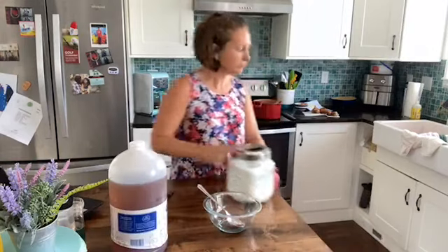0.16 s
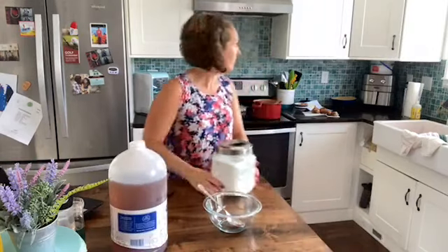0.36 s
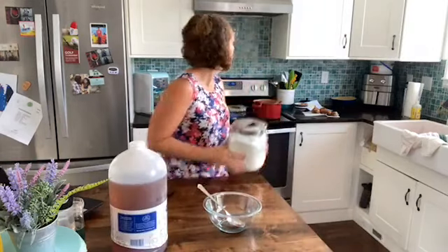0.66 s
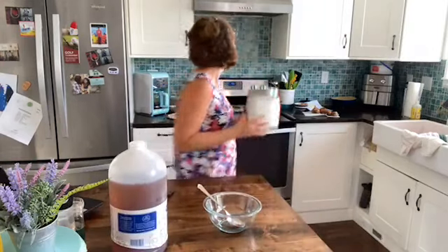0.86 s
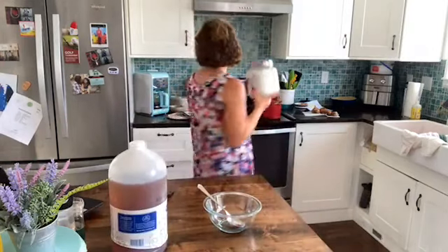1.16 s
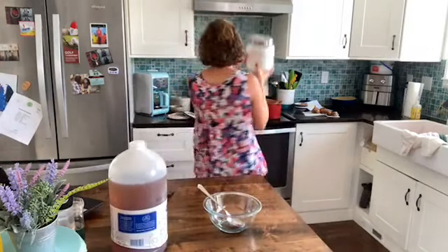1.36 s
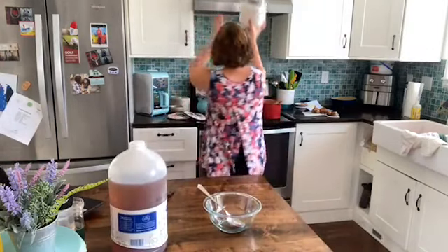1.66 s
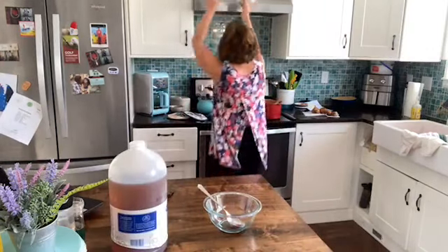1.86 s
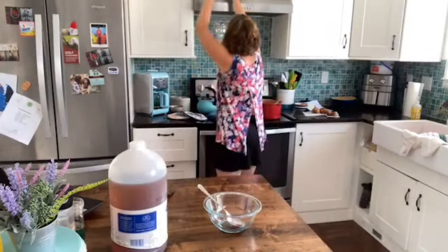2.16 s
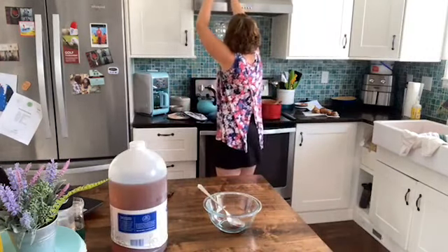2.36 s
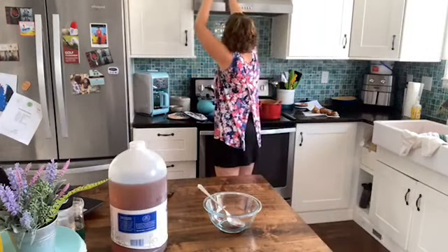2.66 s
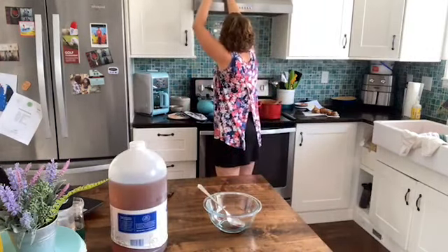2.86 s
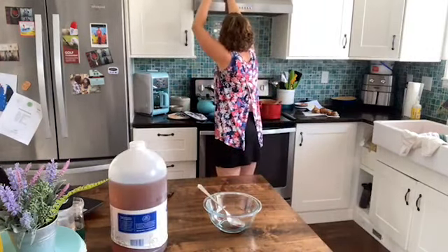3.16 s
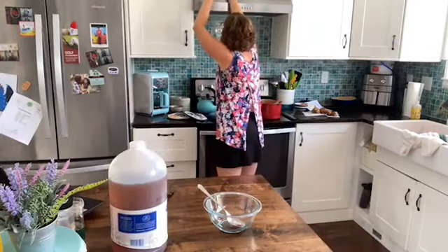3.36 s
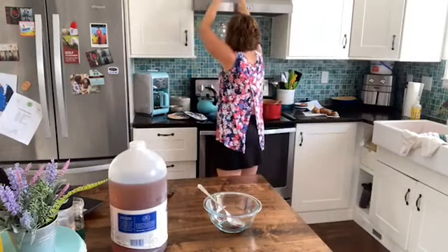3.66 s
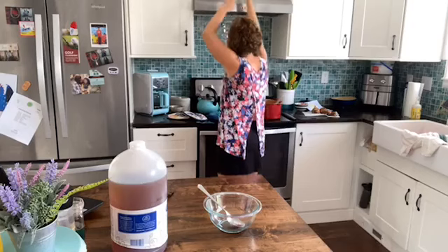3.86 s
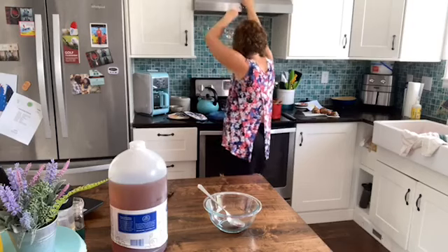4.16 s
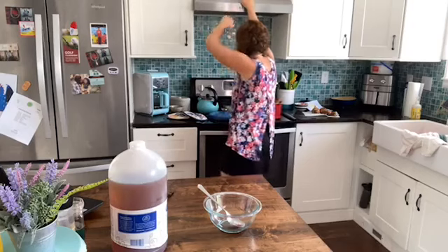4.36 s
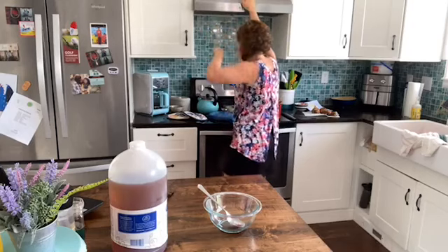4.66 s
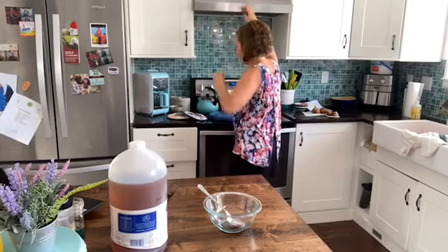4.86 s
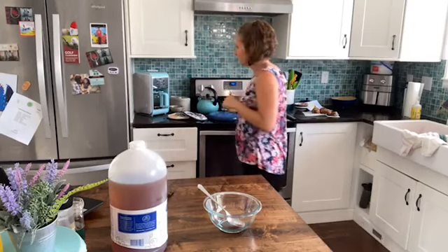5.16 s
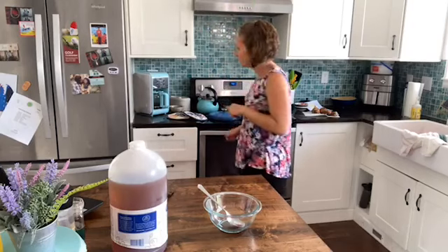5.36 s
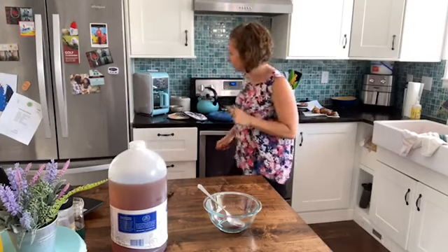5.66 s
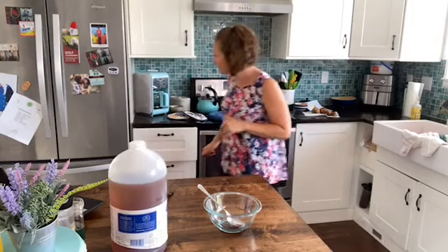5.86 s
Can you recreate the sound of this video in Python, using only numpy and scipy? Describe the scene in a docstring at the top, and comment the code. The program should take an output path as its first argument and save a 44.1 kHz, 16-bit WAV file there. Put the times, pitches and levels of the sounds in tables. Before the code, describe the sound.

A glass canister drags softly across a wooden table over a steady appliance hum. After a lull with faint touches and cloth rustle, it knocks down on a cupboard shelf, bumps and scrapes back, and clacks against a jar. The cupboard door then shuts with a low boom and a bounce, leaving faint metal ticks. The knocks sound distant and ring in a hard-walled kitchen.

```python
"""Putting a glass canister away.

In a hard-walled kitchen a glass canister is dragged off a wooden table, set down on a high shelf and
pushed back until it clacks against a jar; then the cupboard door is knocked shut with a low boom.
A loose metal fitting ticks after the jolts, cloth rustles and fingers touch things. The knocks are far
from the microphone and ring in the room; the drags and rustles are drier. Appliances hum throughout."""
import sys
import numpy as np
from scipy import signal
from scipy.fft import rfft, irfft, next_fast_len
from scipy.io import wavfile
from scipy.ndimage import uniform_filter1d

SR = 44100
rng = np.random.default_rng(int(sys.argv[2]) if len(sys.argv) > 2 else 0)


def store_wav(level_fs):
    """Save 16-bit WAV to argv[1]."""
    pcm = np.round(np.clip(np.atleast_2d(level_fs), -1, 1) * 32767)
    wavfile.write(sys.argv[1], SR, pcm.T.astype(np.int16))


N = 265349

# The canister sliding on wood. Each row: time in seconds, level in dB.
TABLE_DRAG = [(0.0, -35.5), (0.05, -37.5), (0.12, -40.5), (0.318, -33), (0.6, -42), (0.72, -50),
              (0.82, -56), (0.9, -76)]
SHELF_DRAG = [(3.03, -78), (3.052, -35), (3.084, -35), (3.2, -44.5), (3.294, -33.5), (3.34, -27),
              (3.4, -22), (3.462, -34), (3.645, -39.5)]
# Strokes of cloth. Each row: peak time in seconds, peak level in dB, rise and fall in seconds.
CLOTH_STROKES = [(.3, -75, .1, 0.38), (1.33, -66.5, 0.04, 0.056), (2.32, -57, 0.12, 0.16),
                 (4.168, -68, 0.035, 0.077), (5.65, -71.5, 0.056, .05)]
# Knocks. Each row: start in seconds, rough peak in dB, hardness in dB per octave, contact in seconds.
JAR_CLACK = [(3.647, -17, -1.5, 0.00416)]
DOOR_CRACKS = [(4.421, -17.5, 2, 0.0026), (4.427, -17, -0.5, 0.0059)]
DOOR_HITS = [(4.423, -12, 0.9, 0.0049), (4.44, -13, 1, 0.011), (4.462, -14.5, 2, 0.0116),
             (4.585, -16.5, 1, 0.037)]
# Fingers and feet. Each row: as for a knock, then one ring's pitch in Hz, width in Hz, boost in dB.
TOUCHES = [(0.839, -48, -3.5, 0.011, 2300, 250, 13), (1.057, -46.5, -3, 0.023, 1460, 60, 16),
           (1.683, -47, 0.5, 0.007, 3300, 1500, 7), (1.848, -49.5, -2, 0.0099, 2900, 1500, 4),
           (4.104, -46.5, -2, 0.015, 2030, 500, 2), (4.165, -38.5, -4, 0.024, 1750, 900, 3),
           (5.305, -46, -1, 0.01, 2600, 900, 3), (5.439, -51.5, -1, 0.021, 3100, 252, 7)]
# The canister meeting the shelf. Each row: as for a knock, then the force on the glass in dB.
SHELF_KNOCKS = [(2.551, -15.5, 2.5, 0.0079, -95), (2.561, -5.5, 2, 0.0079, -65.5),
                (2.568, -11.5, -1.5, 0.0066, -71.5), (2.609, -16, -4.5, .006, -75),
                (3.044, -25.5, 1, 0.0084, -90), (3.052, -20.5, -1, 0.013, -84),
                (3.085, -33.5, 3.5, 0.004, -78.5), (3.149, -24.5, 1.5, 0.0042, -95),
                (3.344, -19.5, 5, 0.0039, -74), (3.380, -8, 1.5, 0.012, -66),
                (3.435, -11.5, 1, 0.0084, -66.5)]
# Runs of ticks. Each row: first and last start in seconds, first and last level in dB.
TICK_RUNS = [(2.655, 2.85, -47, -49.5), (3.185, 3.22, -50, -52), (3.297, 3.329, -49, -47),
             (4.517, 4.644, -46, -61), (4.848, 4.919, -49, -55)]
# The door swinging and settling. Each row: start in seconds, boom level in dB, pitch in Hz.
DOOR_SWINGS = [(4.428, -14.5, 87.4), (4.499, -26.5, 76), (4.596, -26.5, 82.3), (4.689, -34, 88),
               (4.783, -38, 101)]
# The broad colour of each source. Each row: frequency in Hz, spectral level in dB.
HUM_COLOUR = [(15, -46), (25, -32), (48, -6.5), (80, -12), (102, -3.5), (189, -4), (291, -8.5), (382, -10),
              (414, -12), (486, -11), (620, -19), (749, -20), (1360, -27.5), (1550, -27.5), (15800, -48)]
TABLE_COLOUR = [(50, -12), (100, -4.5), (230, -0.5), (500, -4), (900, -8.5), (2000, -15), (4000, -31.5),
                (8000, -46), (16000, -65)]
CLOTH_COLOUR = [(1500, -35), (2500, -9), (5000, -2.5), (7500, -2.5), (10000, -9.5), (16000, -14)]
TOUCH_COLOUR = [(500, 2.5), (1500, 2), (3000, -0.5), (6000, -2.5), (16000, -22)]
SHELF_COLOUR = [(50, -26), (120, -9.5), (270, -2.5), (600, -5.5), (1000, -8), (2000, -22), (4000, -35),
                (8000, -46), (16000, -65)]
FITTING_COLOUR = [(3000, -37), (4500, -6), (8000, -8), (10000, -10.5), (16000, -17)]
JAR_COLOUR = [(200, -20), (600, 12), (900, 6), (2000, -6), (4000, -2), (8000, -16), (16000, -30)]
EDGE_COLOUR = [(200, -24), (600, 6), (1000, 5), (1500, -11), (3000, -18), (6000, -34), (16000, -63)]
DOOR_COLOUR = [(40, -33), (90, 9), (220, -6), (500, -8.5), (1000, -17), (2000, -26.5), (4000, -38.5),
               (8000, -47.5), (16000, -63)]
# The resonances of each source. Each row: centre in Hz, width in Hz, boost in dB.
HUM_MODES = [(60, 7.3, 8.9), (110.86, 5, 12.4), (195.3, 22, 7.2), (276, 78, 0.95), (390, 53, 4.6),
             (484, 27, 3.5), (3600, 45, 9.2)]
TABLE_MODES = [(233, 15, 11.5), (353, 52, 8), (1445, 130, 1)]
SHELF_MODES = [(230, 20, 3), (166, 28, 5.1), (301, 40, 8.4), (406, 36, 5.6), (580, 28, 8.8), (615, 60, 3.3),
               (748, 8.3, 2.8), (814, 35, 3.1), (930, 140, 3.1), (1240, 15, 2.7), (1410, 33, 2.8),
               (1537, 24, 5.8), (2070, 43, 1.3)]
FITTING_MODES = [(4970, 600, 4.4), (6450, 370, 8.3), (8160, 980, 14), (11000, 900, 6.1), (13300, 700, 6.3),
                 (15300, 700, 7.31)]
JAR_MODES = [(980, 72, 10.5), (1400, 53, 5.4), (1860, 480, 13.7), (2680, 1200, 2.6), (4140, 640, 2.7),
             (6260, 550, 9.3), (7570, 600, 10)]
DOOR_MODES = [(235, 33, 8.5), (285, 41, 13), (437, 33, 11.9), (584, 5.4, 12), (735, 180, 6.8),
              (870, 110, 4.8), (1310, 160, 5.1)]
# The canister's ringing glass. Each row: pitch in Hz, gain in dB, seconds to fall 60 dB.
GLASS_RINGS = [(3066, -8, .08), (5518, 0, .09), (5626, -1, .08), (6288, -3, .04), (7150, -11, .04),
               (9850, -18, .05)]
# The kitchen's reverberation. Each row: frequency in Hz, seconds to fall 60 dB.
KITCHEN_DECAY = [(60, 0.87), (250, 0.66), (1000, 0.62), (4000, 0.67), (8000, 0.44), (15000, 0.5)]


def from_db(db):
    """Decibels to gain."""
    return 10 ** (np.asarray(db) / 20)


def unit_rms(x):
    """Scale to rms 1."""
    return x / np.sqrt(np.mean(x ** 2) + 1e-20)


def envelope(rows):
    """Gain per sample from a level curve; silent outside it."""
    times, level_db = np.transpose(rows)
    return from_db(np.interp(np.arange(N) / SR, times, level_db, left=-140, right=-140))


def bandpass(x, low_hz, high_hz):
    """One band of a sound, with gentle slopes."""
    return signal.sosfilt(signal.butter(2, [low_hz, high_hz], "band", fs=SR, output="sos"), x)


def colour(x, spectrum, modes=(), tilt_db=0.):
    """Causal (minimum-phase) filter from a spectrum, resonant boosts and a tilt per octave; rms 1."""
    size = 2 * next_fast_len(len(x) // 2 + 1)
    hz = np.maximum(np.arange(size // 2 + 1) * SR / size, 1)
    points_hz, level_db = np.transpose(spectrum)
    gain_db = np.interp(np.log(hz), np.log(points_hz), level_db)
    gain_db += tilt_db * np.log2(np.maximum(hz, 50) / 1000)
    for centre, width, boost_db in modes:
        gain_db += boost_db / (1 + (2 * (hz - centre) / width) ** 2)
    cepstrum = irfft(gain_db * np.log(10) / 20, size)
    cepstrum[1:size // 2] *= 2  # folding the cepstrum puts all ringing after the cause
    cepstrum[size // 2 + 1:] = 0
    response = np.exp(rfft(cepstrum))
    return unit_rms(irfft(rfft(x, size) * response, size)[:len(x)])


def grains(per_s, spread_db):
    """Random micro-impacts of uneven size."""
    sizes = from_db(spread_db * np.minimum(rng.exponential(1, N), 5)) * rng.choice([-1, 1], N)
    return sizes * (rng.random(N) < per_s / SR)


def drift(rate_hz, steps_per_s=60):
    """A slow random wander with a spread of about 1."""
    steps = rng.standard_normal(int(N / SR * steps_per_s) + 2)
    pole = np.exp(-2 * np.pi * rate_hz / steps_per_s)
    wander = unit_rms(signal.lfilter([1], [1, -pole], steps))
    return np.interp(np.arange(N) / SR * steps_per_s, np.arange(len(steps)), wander)


def blows(rows, spectrum, modes=()):
    """Each blow is a short scatter of contacts that excites the whole body evenly."""
    out, t = np.zeros(N), np.arange(SR // 3) / SR
    for start, peak_db, hardness_db, contact_s, *_ in rows:
        rise_s = min(.0031, 0.44 * contact_s)
        shape = (1 - np.exp(-t / rise_s)) * np.exp(-t / contact_s)
        force = rng.standard_normal(len(t)) * shape
        for _ in range(3):  # even out the spectrum, keep the shape in time
            bins = rfft(force)
            force = irfft(bins / np.abs(bins), len(t))
            force *= shape / (uniform_filter1d(np.abs(force), size=45) + 1e-9)
        burst = from_db(-23) * colour(force, spectrum, modes, hardness_db)  # peaks near 1
        at = round(start * SR)
        out[at:at + len(t)] += from_db(peak_db) * burst[:N - at]
    return out


def appliance_hum():
    """The room tone: steady low noise with the appliances' resonances standing out."""
    return from_db(-51.5) * colour(rng.standard_normal(N), HUM_COLOUR, HUM_MODES)


def drag(curve, spectrum, modes, grit_db, tilt_db):
    """The rim stutters over wood grain: rumble and grit whose bands swell as the contact shifts."""
    scrape = colour(grains(per_s=4000, spread_db=1.5), spectrum, modes, tilt_db)
    rumble, grit = np.zeros(N), np.zeros(N)
    edges_hz = 40 * 2 ** np.arange(0, 9, .5)
    for low, high in zip(edges_hz, edges_hz[1:]):
        band = bandpass(scrape, low, high) * from_db(1.3 * drift(rate_hz=8))
        if low < 1700:
            rumble += band
        else:
            grit += band
    return envelope(curve) * (unit_rms(rumble) + from_db(grit_db) * unit_rms(grit))


def cloth():
    """Smooth bright hiss of fabric sliding; each stroke swells and fades like a bell curve."""
    t, level = np.arange(N) / SR, 0
    for peak_s, peak_db, rise_s, fall_s in CLOTH_STROKES:
        width_s = np.where(t < peak_s, rise_s, fall_s)
        level += from_db(peak_db) * np.exp(-((t - peak_s) / width_s) ** 2)
    return level * colour(rng.standard_normal(N), CLOTH_COLOUR)


def touches():
    """Each small touch lands on a different thing with one ring of its own."""
    return sum(blows([row], TOUCH_COLOUR, modes=[row[4:]]) for row in TOUCHES)


def shelf_knocks():
    """Up in the cupboard, the canister's base knocks on the shelf and sounds the board."""
    return blows(SHELF_KNOCKS, SHELF_COLOUR, SHELF_MODES)


def glass(bowing_db=-74, chatter_s=0.039):
    """Each knock makes the glass chatter and ring for a moment; sliding on the shelf bows it."""
    t, out = np.arange(N) / SR, np.zeros(N)
    push = from_db(bowing_db) * envelope(SHELF_DRAG)
    for start, *_, force_db in SHELF_KNOCKS:
        push += from_db(force_db) * (t >= start) * np.exp(-np.abs(t - start) / chatter_s)
    force = push * unit_rms(grains(per_s=3000, spread_db=4.5)) + 1e-18
    for hz, gain_db, t60 in GLASS_RINGS:
        decay, angle = from_db(-60 / (t60 * SR)), 2 * np.pi * hz / SR  # per sample
        feedback = [1, -2 * decay * np.cos(angle), decay ** 2]
        out += from_db(gain_db) * signal.lfilter([0, np.sin(angle)], feedback, force)
    return out


def fitting(rock_s=.039, contact_s=0.01):
    """Loose metal rocks in runs of evenly spaced ticks, each run gliding in level."""
    ticks = []
    for first_s, last_s, first_db, last_db in TICK_RUNS:
        count = round((last_s - first_s) / rock_s) + 1
        run = np.linspace((first_s, first_db), (last_s, last_db), count)
        ticks += [(start, peak_db, 0, contact_s) for start, peak_db in run]
    return blows(ticks, FITTING_COLOUR, FITTING_MODES)


def jar_clack():
    """At the end of its slide the canister strikes a neighbouring jar."""
    return blows(JAR_CLACK, JAR_COLOUR, JAR_MODES)


def door_knocks():
    """The door's edge cracks against the frame; the panel thuds and bounces."""
    return blows(DOOR_CRACKS, EDGE_COLOUR) + blows(DOOR_HITS, DOOR_COLOUR, DOOR_MODES)


def door_boom(swell_s=.026):
    """Each swing of the door pumps the cupboard's air: a low tone that swells and dies in a few cycles."""
    out = np.zeros(N)
    for start, boom_db, hz in DOOR_SWINGS:
        t = np.maximum(np.arange(N) / SR - start, 0)
        swell = (t / swell_s * np.exp(1 - t / swell_s)) ** 2
        out += from_db(boom_db) * swell * np.sin(2 * np.pi * hz * t)
    return out


def kitchen(x, onset_s=0.00067):
    """Dense reflections off hard walls, each half octave dying at its own rate."""
    t, tail = np.arange(SR) / SR, np.zeros(SR)
    hz, t60 = np.transpose(KITCHEN_DECAY)
    for low in 30 * 2 ** np.arange(0, 9.5, .5):
        band = bandpass(rng.standard_normal(SR), low, np.sqrt(2) * low)
        band_t60 = np.interp(np.log(low * 2 ** .25), np.log(hz), t60)
        tail += band * from_db(-60 * t / band_t60)
    tail *= 1 - np.exp(-t / onset_s)
    return signal.fftconvolve(x, tail / np.sqrt(np.sum(tail ** 2)))[:N]


def scene():
    """At one microphone: far knocks with plenty of room, drier drags and rustles, all over the hum."""
    drags = drag(TABLE_DRAG, TABLE_COLOUR, TABLE_MODES, grit_db=-8.5, tilt_db=0.5)
    drags += drag(SHELF_DRAG, SHELF_COLOUR, SHELF_MODES, grit_db=-11.5, tilt_db=2)
    rustle = cloth()
    knocks = touches() + shelf_knocks() + jar_clack() + door_knocks()
    rings, ticks = glass(), fitting()
    direct = appliance_hum() + drags + rustle + knocks + rings + ticks + door_boom()
    into_room = (from_db(-7.5) * drags + from_db(-9.5) * rustle + from_db(0.5) * knocks
                 + from_db(-6) * rings + from_db(-1.5) * ticks)
    return (direct + kitchen(into_room))[None]


def record(dry):
    """The microphone drops the deepest bass; the top is cut steeply."""
    low_cut = signal.butter(3, 60, "high", fs=SR, output="sos")
    high_cut = signal.ellip(12, .5, 75, 15900, fs=SR, output="sos")
    return signal.sosfilt(high_cut, signal.sosfilt(low_cut, dry))


dry = scene()
out = record(dry)
store_wav(out)
```